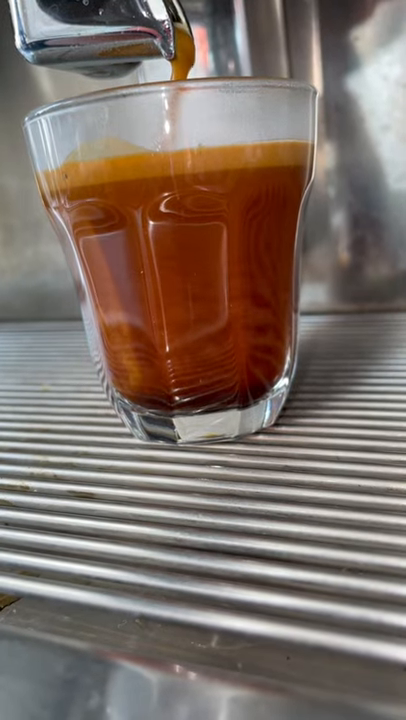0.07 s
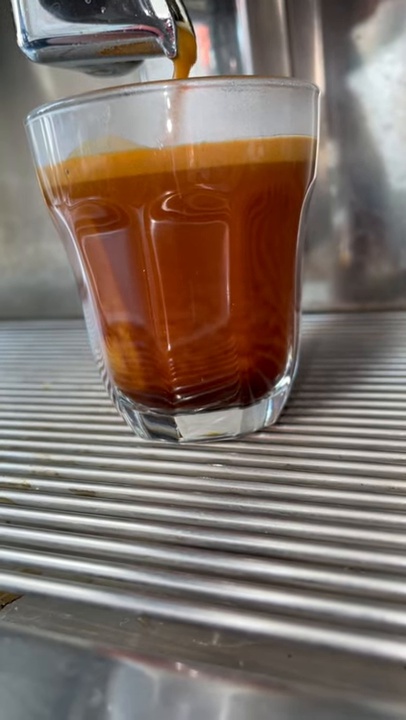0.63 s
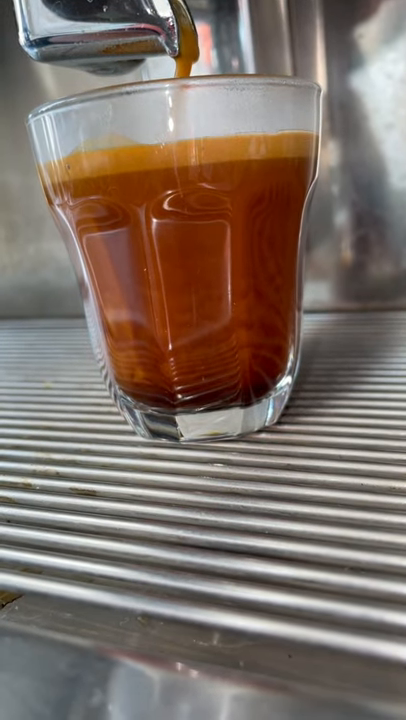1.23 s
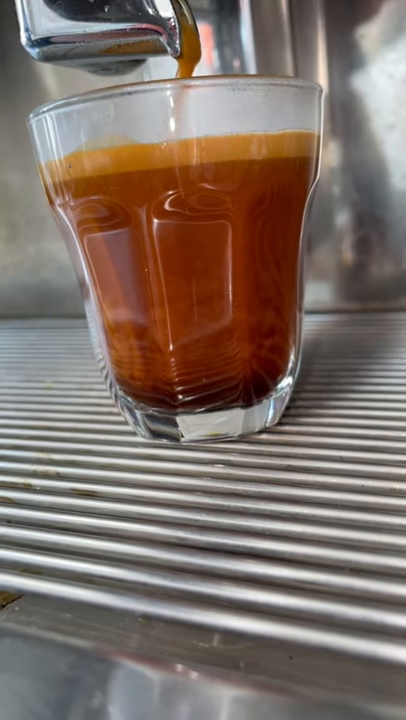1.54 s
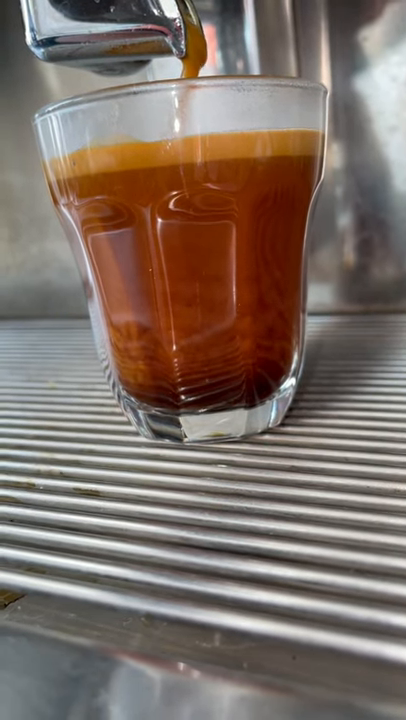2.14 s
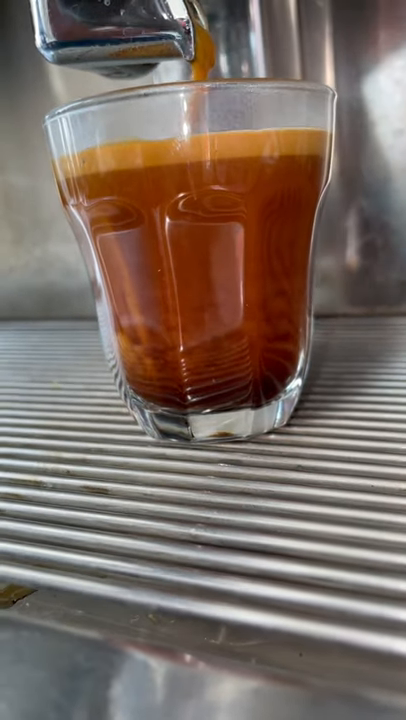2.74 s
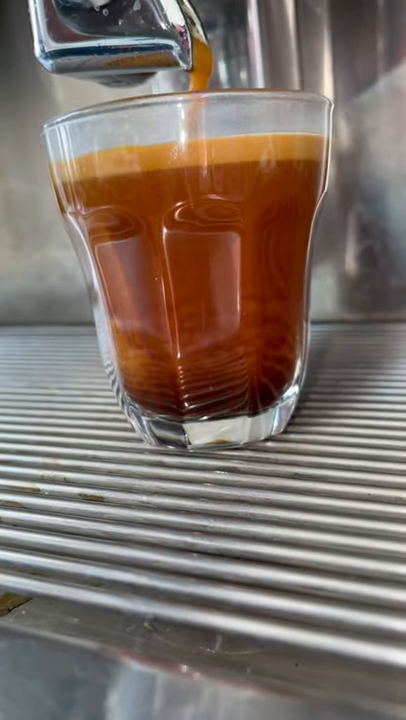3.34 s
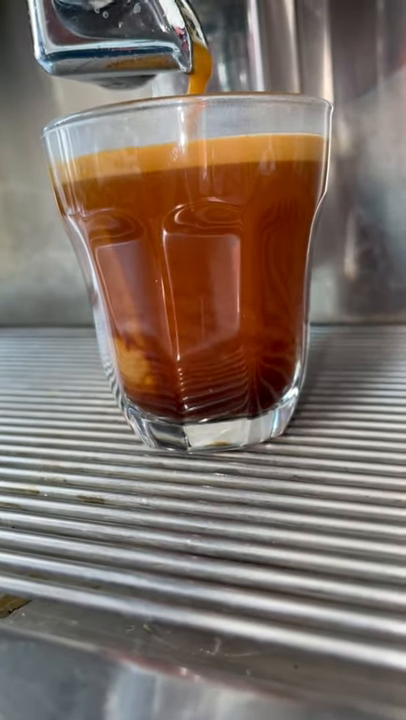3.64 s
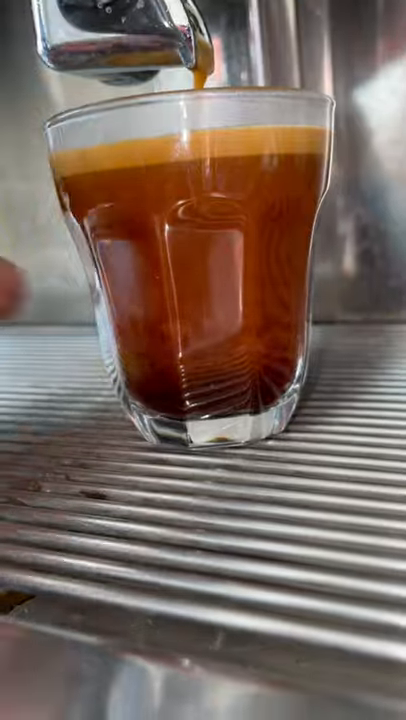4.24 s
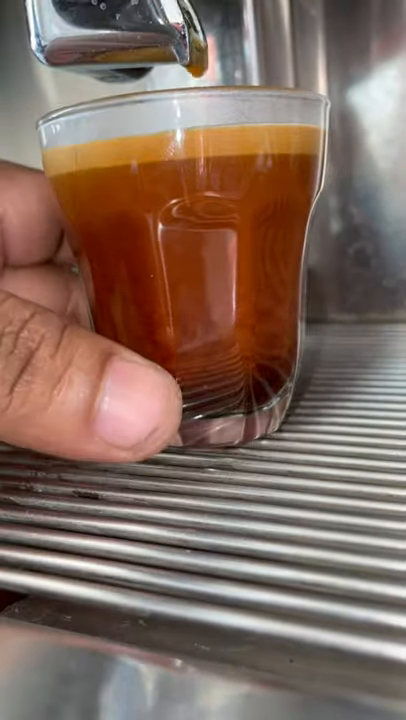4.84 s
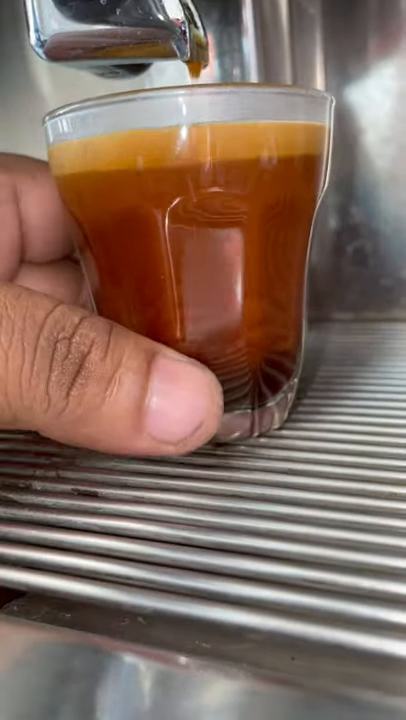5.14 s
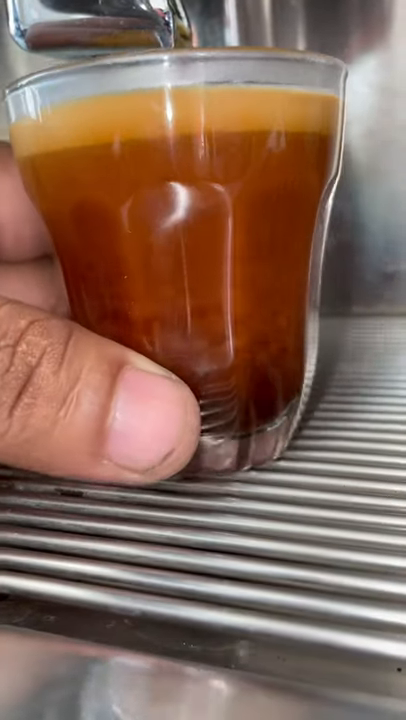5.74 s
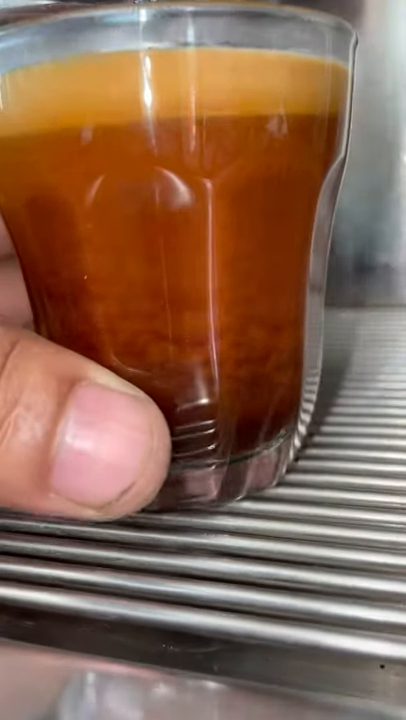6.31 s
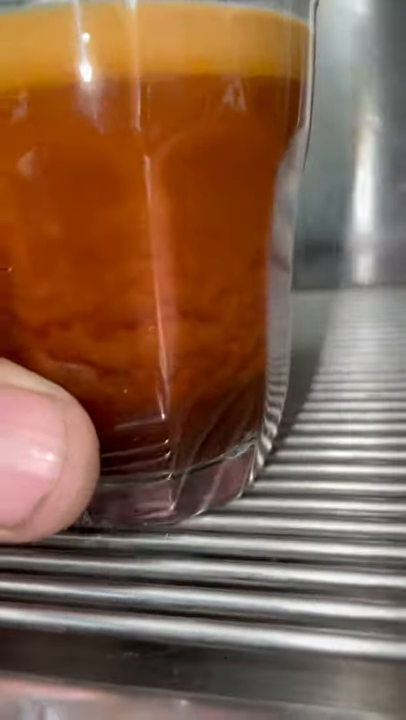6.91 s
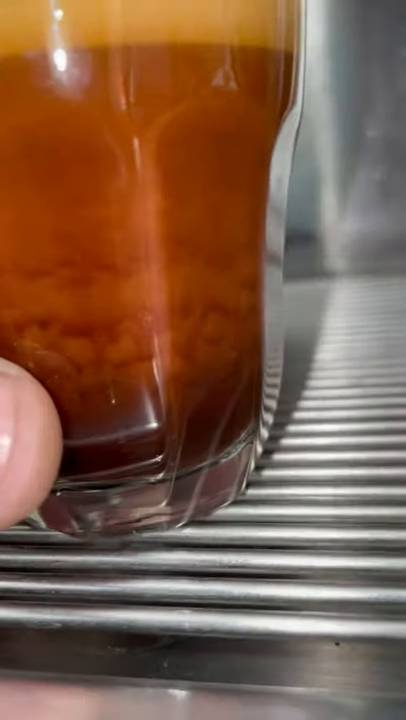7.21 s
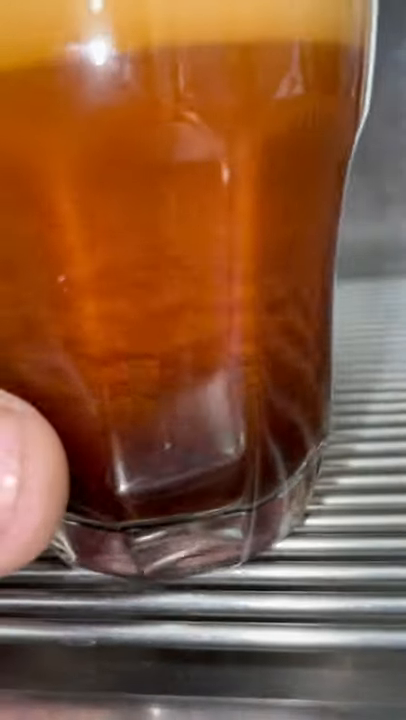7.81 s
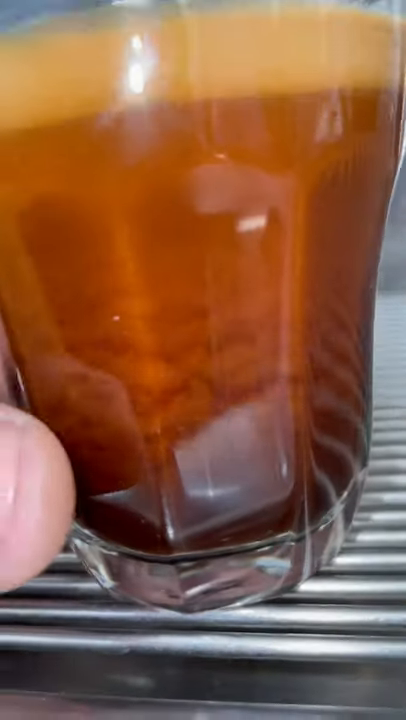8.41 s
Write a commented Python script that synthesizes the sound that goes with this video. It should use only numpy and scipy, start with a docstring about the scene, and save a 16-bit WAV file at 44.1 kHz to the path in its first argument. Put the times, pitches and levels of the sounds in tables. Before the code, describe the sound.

Close to the drip tray, an espresso machine pump hums and buzzes steadily over a low room rumble, and a glass rattles briefly. A valve snaps shut with a short metallic ring, the pump dies away and water ticks in the drain. The glass then scrapes lightly across the steel grille and squeals thinly. At the end the pump starts again with a soft bump.

```python
"""An espresso machine pulls a shot, heard from just above its drip tray. Over the low rumble of the bar, a
four-vane rotary pump hums and buzzes at harmonics of its shaft speed; the grille rattles briefly. A valve snaps
shut and sets the steel panels ringing, the pump dies away, a pipe knocks, and water ticks in the drain. The
glass is drawn across the steel grille: friction makes it scrape, then squeal thinly. At the end the pump motor
starts again without load, with a shudder and a soft bump."""
import sys
import numpy as np
from scipy import signal
from scipy.fft import rfft, irfft
from scipy.io import wavfile

SR = 44100
rng = np.random.default_rng(int(sys.argv[2]) if len(sys.argv) > 2 else 0)


def log_audio(samples):
    """Write samples as a 16-bit WAV file to the path given in sys.argv[1]."""
    # one column per channel
    frames = np.atleast_2d(samples).T
    # limit to full scale, then quantise
    limited = np.clip(frames, -1, 1)
    pcm = np.round(limited * 32767).astype(np.int16)
    wavfile.write(sys.argv[1], SR, pcm)


N = 381906
TIME = np.arange(N) / SR
FREQ = np.fft.rfftfreq(N, 1 / SR)
SIDES = np.array([[1], [-1]])  # left, right

# Noise spectrum of the bar's rumble: (f/Hz, density level/dB)
BAR_RUMBLE = [(22, -72), (32, -67), (48, -55), (70, -53), (100, -59), (140, -57), (165, -59.5), (320, -62),
              (365, -66), (410, -61), (455, -62.5), (490, -68.5), (580, -73.5), (800, -72.5), (1500, -83),
              (2300, -87), (2530, -85), (2750, -89.5), (4600, -100), (6000, -99), (11000, -101.2),
              (15500, -111.7)]
# Compressor and mains hum: (f/Hz, rms level/dB, relative unsteadiness)
FRIDGE_HUM = [(56.55, -32, 0.22), (84.9, -52.5, 0.4), (120.5, -39.5, 0.16), (219.5, -48.5, 0.51)]
# Low pump harmonics: (shaft order, level/dB, change without load/dB)
HUM_HARMONICS = [(4, -33.5, -2), (8, -34, 2.5), (12, -38, 7.5), (14, -43.5, -6), (15, -36, -12),
                 (16, -30, -2), (17, -44, 6), (18, -48, -3), (20, -43, 1), (21, -51, 10), (28, -49, 11),
                 (32, -53, -6)]
# High pump harmonics: (shaft order, mid-shot level/dB, growth over the shot/dB)
WHINE_HARMONICS = [(47, -57, 0), (56, -52.8, 0), (60, -48.8, 0), (64, -60.5, -3), (68, -62, 7),
                   (80, -59.5, 0), (100, -61.5, 7), (116, -65, 2), (128, -63, 3), (140, -59, 0),
                   (147, -61.5, 8), (151, -64, 8), (160, -63.5, 2), (311, -66, 0), (319, -59.5, 0),
                   (343, -61.5, 0), (351, -63, 0), (355, -65, 0), (409, -66, 0), (435, -65.5, 0),
                   (452, -67, 0)]
# Envelope that the casing gives the remaining harmonics: (f/Hz, level/dB)
BUZZ_SPECTRUM = [(600, -62), (850, -57.5), (1100, -69), (1500, -68), (1900, -75.5), (2200, -65.5),
                 (2450, -82), (3200, -78), (3900, -73.5), (4700, -81.5), (6000, -74.5), (7200, -74.5),
                 (10000, -73), (12000, -76.5), (15500, -93)]
# Water rushing through the pump: (f/Hz, density level/dB)
FLOW_SPECTRUM = [(400, -71), (800, -80), (1200, -101), (1600, -84), (2200, -86), (3000, -92), (3900, -81.5),
                 (4700, -91), (6000, -86.5), (7800, -90.5), (9600, -80), (12500, -91.5), (15500, -88)]
# Stereo balance of the pump's harmonics: (f/Hz, left minus right/dB)
PUMP_PAN = [(210, 0), (420, 3), (700, 4), (1300, 2.5), (2400, -1), (4400, 0)]
# Impacts of the four vanes: (position/turns, mid-shot level/dB, growth over the shot/dB)
VANE_IMPACTS = [(0, -45.5, 4), (.245, -41, -3), (.462, -39.5, -2), (.72, -49, 10)]
# Casing modes struck by a vane: (f/Hz, level/dB, rise/s)
CASING_MODES = [(3840, -1.5, 0.00074), (9590, -9.5, 0.0017)]
# Rattles of the grille, then scrapes of the glass on it: (t/s, level/dB, rise/s, sizzle level/dB, damping
# factor, # tilt/(dB/octave), contact note f/Hz, its relative level/dB)
GRILLE_SLIPS = [(2.4234, -37.5, 0.012, -51, 2, 0, 1950, -11), (2.485, -38.5, .015, -48, 2.5, -1, 2040, -10),
                (2.531, -39, 0.016, -48, 2.2, 1, 1850, -12), (2.612, -42, 0.012, -48, 2.5, 1, 2200, -12),
                (4.4227, -37.5, .011, -30, 6, -1, 5300, -11), (4.445, -41, .021, -47, 5, -1, 5350, -10),
                (4.555, -47, .014, -55, 4, -3, 5400, -15), (5.318, -43, 0.016, -55, 2, 4, 5700, -10),
                (5.535, -42, 0.031, -60, 4.5, -0.5, 1620, -10), (5.6, -42.5, 0.023, -60, 4, -1, 2170, -10),
                (5.77, -43, 0.026, -60, 4.6, -3, 900, -8), (5.803, -39.7, 0.02, -55, 2.3, -1, 5350, -13),
                (6.0644, -44.5, 0.015, -64, 2.5, 1, 3900, -12),
                (6.3424, -44, 0.0078, -63, 1.2, -6, 2150, -12), (6.372, -47, .009, -63, 2, -3, 2100, -8),
                (6.822, -46, 0.01, -52, 3, -1, 1250, -2), (6.979, -36.5, 0.02, -42, 1.5, 2.5, 2100, -12),
                (7.118, -36, 0.018, -44, 2.5, 3.5, 1610, -15), (7.1564, -42, .019, -31, 6, 1, 3150, -8),
                (7.4224, -40, 0.016, -56, 2, -2, 4200, -11), (7.48, -47.5, 0.02, -60, 5, -6, 1650, -7),
                (7.992, -35.5, .017, -56, 2, -1.5, 3800, -14)]
# Resonances of the grille: (f/Hz, half width/Hz, level/dB)
GRILLE_RESONANCES = [(660, 62, -14), (1700, 120, -12), (2155, 26, -9.5), (2480, 320, -13),
                     (3340, 33, -18.5), (3900, 39, -16), (4214, 16, -14), (5010, 22, -27),
                     (5170, 16, -16.5), (5630, 11, -19.5), (5850, 18, -22.5), (6460, 2200, -19)]
# Resonances that colour the steady rubbing: (f/Hz, half width/Hz, level/dB)
RUBBING_RESONANCES = [(720, 115, 4), (1500, 80, 3), (2125, 32, 4), (3850, 98, 1), (4200, 30, -5),
                      (5420, 230, -5), (6230, 230, -5.5), (6500, 900, -28), (11100, 680, -12.5),
                      (15000, 900, -25)]
# Impacts of the closing valve: (t/s, level/dB, tilt/(dB/octave))
VALVE_IMPACTS = [(3.528, -22, -7), (3.5832, -1.5, -5), (3.5846, -17.5, 4), (3.5856, -16.5, 4),
                 (3.587, -16, 3.5), (3.591, -24, -1), (3.5985, -22.5, 2.5), (3.607, -22, 0),
                 (3.6118, -24, 0), (3.6168, -22, -5)]
# Modes of the valve body: (f/Hz, level/dB, T60/s)
VALVE_BODY = [(490, -37, .05), (1200, -8, 0.019), (1440, -4.3, 0.0075), (1940, -17, .022),
              (3270, -17, 0.013), (4580, -23, .013), (5600, -9, 0.013), (6360, -4.5, 0.012),
              (9500, -13, 0.009), (11000, -16.5, 0.0075)]
# Diffuse ringing of the steel panels: (f/Hz, density level/dB)
PANEL_SPECTRUM = [(150, -82), (500, -49), (1100, -55.5), (2000, -58), (3500, -66), (6000, -64.5),
                  (8000, -69.5), (11000, -69.5), (15000, -79)]
# Distinct modes of the panels: (f/Hz, level/dB, T60/s)
PANEL_NOTES = [(1530, -38, 0.27), (2030, -33, 0.2), (2190, -31.5, .16), (2650, -45, .13),
               (3340, -28.5, .11), (4520, -32, .09), (5700, -35, .14), (6315, -27, 0.11)]
# Loudest ticks of water in the drain: (t/s, level/dB)
DRAIN_TICKS = [(3.8023, -38), (3.839, -43), (3.8706, -40), (3.904, -39), (3.947, -42), (3.9729, -40),
               (4.0008, -39), (4.0273, -41), (4.0537, -41), (4.083, -40), (4.1146, -42), (4.148, -41),
               (4.1989, -37), (4.227, -43), (4.31, -45), (4.3814, -46), (4.4084, -44), (4.7915, -43),
               (4.8369, -46)]
# Resonances excited by those ticks: (f/Hz, half width/Hz, level/dB)
DRAIN_RESONANCES = [(3800, 290, 1), (5500, 320, -3), (6300, 180, 1), (9600, 430, -9), (11200, 410, -3.5),
                    (15100, 830, -10)]
# Squeals of glass on steel: (t/s, duration/s, start f/Hz, end f/Hz, level/dB, roughness 0-1,
# relative level of the upper tone/dB)
GLASS_SQUEALS = [(7.202, 0.5, 11500, 11220, -58, .5, -15), (7.724, .1, 10000, 9950, -56, .4, -20),
                 (7.757, .07, 11400, 12200, -51, 0.71, -24), (7.81, .06, 10900, 11400, -54, .8, -6),
                 (7.867, .07, 10350, 10900, -53, 0.62, -1), (7.94, .2, 10900, 11050, -58.5, .85, 0),
                 (8.132, 0.24, 11000, 11480, -50.5, .65, -9), (8.341, 0.13, 11300, 10800, -53.5, .7, -3),
                 (8.48, 0.21, 10600, 10400, -52.5, 0.2, -34)]
# Friction hiss around a rough squeal: (f/Hz, half width/Hz, level/dB)
SQUEAL_BANDS = [(9100, 350, 0), (11300, 700, 1), (12700, 400, -2)]
# Shudder of the frame: (f/Hz, density level/dB)
FRAME_SPECTRUM = [(50, -62), (130, -56), (450, -70), (900, -68), (2000, -82), (5000, -105)]
# Stereo width at the two microphones: (f/Hz, side minus mid/dB)
STEREO_WIDTH = [(60, -39), (120, -48), (200, -28), (380, -11), (700, -2), (1300, -1), (2000, -6),
                (2600, 2.5), (4000, -5.5), (5500, -4.5), (7000, -68), (15000, -63)]
# Phase difference between the microphone ports: (f/Hz, phase/cycles)
PORT_PHASE_SHIFT = [(5400, 0), (6400, .25), (7600, .5), (9000, .78), (11000, 1), (14200, 1.5),
                    (15800, 1.68)]

SHAFT_HZ, IDLE_HZ = 27.1, 27.5
STOP_S, RESTART_S, UNLOAD_S = 3.585, 8.47, 0.021  # pump off, pump on, time constant of unloading
SNAP_S = VALVE_IMPACTS[2][0]  # first hard metal contact in the valve


def undb(db):
    """Amplitude ratio of a level in decibels."""
    return 10 ** (np.asarray(db) / 20)


def shape(table, hz):
    """Gain from an (f/Hz, level/dB) table, interpolated in log frequency."""
    f, db = np.transpose(table)
    return undb(np.interp(np.log(np.maximum(hz, 1)), np.log(f), db))


def unit(x):
    """Normalisation to rms 1."""
    return x / np.sqrt(np.mean(x ** 2))


def since(s):
    """Time elapsed since an onset; zero before it."""
    return np.maximum(TIME - s, 0)


def hold(start_s, end_s, attack_s, release_s):
    """Trapezoidal envelope: linear attack, hold and release."""
    return np.clip(np.minimum((TIME - start_s) / attack_s, (end_s - TIME) / release_s), 0, 1)


def pulse(age, rise_s):
    """Critically damped impulse response, peaking at 1 after rise_s."""
    return age / rise_s * np.exp(1 - age / rise_s)


def walk(rate_hz):
    """Slow random modulation: low-passed Gaussian noise of rms 1."""
    return unit(irfft(rfft(rng.standard_normal(N)) * np.exp(-(FREQ / rate_hz) ** 2), N))


def noise(density):
    """Mid-side noise of a given amplitude spectral density; the bass is coherent between the sides."""
    mid, side = irfft(rfft(rng.standard_normal((2, N))) * density * np.sqrt(SR / 2), N)
    return mid + SIDES * irfft(rfft(side) * shape(STEREO_WIDTH, FREQ), N)


def ringing(resonances):
    """Randomly excited resonances (f/Hz, half width/Hz, level/dB) add in power; scaled to rms 1."""
    power = 0
    for hz, width, db in resonances:
        detuning = (FREQ ** 2 - hz ** 2) / (2 * width * np.maximum(FREQ, 1))
        power += undb(db) ** 2 / (1 + detuning ** 2)
    return unit(noise(np.sqrt(power)))


def resonate(force, hz, half_width_hz):
    """Forced response of one damped mode, scaled so that white noise keeps its level."""
    pole = np.exp(2 * np.pi * (1j * hz - half_width_hz) / SR)
    return signal.lfilter([np.sqrt(2 * (1 - abs(pole) ** 2))], [1, -pole], force).imag


def bar():
    """Background noise: broadband rumble, and fridge hums modulated in amplitude and phase."""
    out = noise(shape(BAR_RUMBLE, FREQ))
    for hz, db, unsteadiness in FRIDGE_HUM:
        sway = 1 + unsteadiness * (walk(6.6) + 1j * walk(4.5))
        out += np.sqrt(2) * undb(db) * np.real(sway * np.exp(2j * np.pi * hz * TIME))
    return out


def motor(unloaded, coast_s=0.28, spin_up_s=0.0145, speed_loss=0.55):
    """Inertia: speed/Hz and drive/dB fall ever faster after switch-off, then recover to an idle."""
    unloaded_db, idle_db, coast_db = -3.5, -8.5, -65
    slowed = np.minimum(since(STOP_S) / coast_s, 1) ** 2.7 * np.exp(-since(RESTART_S) / spin_up_s)
    speed = np.where(TIME < RESTART_S, SHAFT_HZ, IDLE_HZ) * (1 - speed_loss * slowed)
    load_db = np.where(TIME < RESTART_S, unloaded_db * unloaded, idle_db)
    return speed, load_db + coast_db * slowed


def harmonics(turns, tones, control, waver_db, waver_hz, main_order=16, sideband_rad=1.15):
    """Rotation sounds at multiples of the shaft speed; each level follows the control and wavers."""
    out = np.zeros((2, N))
    for order, db, change_db in tones:
        hz = order * SHAFT_HZ
        waver = np.interp(TIME * waver_hz, np.arange(400), rng.standard_normal(400))
        spread = 1 + 1j * SIDES * shape(STEREO_WIDTH, hz) * rng.choice([-1, 1])
        stereo = spread * shape(PUMP_PAN, hz) ** (SIDES / 2)
        # phase-locked sidebands sway the strongest hum more in pitch than in level
        apart = abs(order - main_order)
        free_phase = 2 * np.pi * rng.random()
        phase = sideband_rad * apart if apart <= 2 else free_phase
        tone = np.exp(1j * (2 * np.pi * order * turns + phase))
        out += np.sqrt(2) * undb(db + change_db * control + waver_db * waver) * np.real(stereo * tone)
    return out


def revolve(turns, orders, rms, size=16384):
    """Fourier synthesis of one turn of vibration, repeated as the shaft goes round."""
    hz = orders * SHAFT_HZ
    phasor, across = np.exp(2j * np.pi * rng.random((len(orders), 2)).T)
    side = shape(STEREO_WIDTH, hz) * 1j * np.sign(across.imag)
    bins = np.zeros((2, size // 2 + 1), complex)
    bins[:, orders] = rms * phasor * (1 + SIDES * side) * shape(PUMP_PAN, hz) ** (SIDES / 2)
    cycle = irfft(bins) * size / np.sqrt(2)
    return np.array([np.interp(turns % 1 * size, np.arange(size), c, period=size) for c in cycle])


def casing_buzz(turns, vane_db=5, scatter_db=3, drift_hz=0.11):
    """Dense harmonics, stronger at multiples of the vane-passing rate; two sets slowly crossfade."""
    tonal_orders = [row[0] for row in [*HUM_HARMONICS, *WHINE_HARMONICS]]
    orders = np.setdiff1d(np.arange(19, 570), tonal_orders)
    envelope = shape(BUZZ_SPECTRUM, orders * SHAFT_HZ)
    out = np.zeros((2, N))
    for blend in (np.cos, np.sin):
        db = scatter_db * rng.standard_normal(len(orders)) + vane_db * (orders % 4 == 0) - 1
        out += blend(2 * np.pi * drift_hz * TIME) * revolve(turns, orders, envelope * undb(db))
    return out


def vane_ticks(turns, shot, scatter_db=1.8, jitter_turns=0.0003):
    """Periodic impacts: each vane rings the casing once a turn, never twice quite alike."""
    out = np.zeros(N)
    for place, db, growth_db in VANE_IMPACTS:
        turn_number = (turns - place + 1).astype(int)
        strength, lateness = rng.standard_normal((300, 2))[turn_number].T
        age = np.maximum((turns - place) % 1 - jitter_turns * lateness, 0) / SHAFT_HZ
        tick = sum(undb(mode_db) * pulse(age, rise_s) * np.sin(2 * np.pi * hz * age)
                   for hz, mode_db, rise_s in CASING_MODES)
        out += undb(db + growth_db * shot + scatter_db * strength) * tick
    return out


def pump(wobble=0.0002, pulsing=0.46, rise_db=2, load_power=4.6):
    """Rotating machine: whine, ticks, buzz and hiss depend on pressure and die sooner than the hum."""
    unloaded = 1 - np.exp(-since(STOP_S) / UNLOAD_S)
    speed, drive_db = motor(unloaded)
    turns = np.cumsum(speed * (1 + wobble * walk(10.3))) / SR
    shot = np.minimum(TIME / STOP_S, 1) - 0.5  # progress, zero at mid-shot
    hum = harmonics(turns, HUM_HARMONICS, unloaded, waver_db=0.33, waver_hz=7)
    whine = harmonics(turns, WHINE_HARMONICS, shot, waver_db=1, waver_hz=4)
    buzz = casing_buzz(turns)
    puffs = unit(np.exp(-pulsing * (4 * turns % 1)))  # each passing vane releases a puff of water
    hiss = noise(shape(FLOW_SPECTRUM, FREQ)) * undb(-1) * puffs
    under_load = whine + vane_ticks(turns, shot) + (buzz + hiss) * undb(rise_db * shot)
    return hum * undb(drive_db) + under_load * undb(load_power * drive_db)


def scrapes(grit_db=2, scatter_db=2, detune=0.012, note_width_hz=70, tail_db=-13, tail_s=0.07):
    """Friction drives the grille's modes; the glass's foot shifts and damps them and adds a note."""
    out, age = np.zeros((2, N)), TIME[:SR // 3]
    grit = undb(grit_db * walk(380))
    for s, db, rise_s, _, damping, tilt, note_hz, note_db in GRILLE_SLIPS:
        span = slice(int(s * SR), int(s * SR) + len(age))
        tail = undb(tail_db) * (1 - np.exp(-age / rise_s)) * np.exp(-age / tail_s)
        force = rng.standard_normal((2, len(age))) * np.hypot(grit[span] * pulse(age, rise_s), tail)
        modes = [(note_hz, note_width_hz, note_db)]
        for hz, width, mode_db in GRILLE_RESONANCES:
            shift, weight = rng.standard_normal(2)
            excited_db = mode_db + tilt * np.log2(hz / 3000) + scatter_db * weight
            modes.append((hz * (1 + detune * shift), min(width * damping, hz / 7), excited_db))
        for hz, width, mode_db in modes:
            mid, side = resonate(force, hz, width) * undb(db + mode_db)
            spread = shape(STEREO_WIDTH, hz)
            out[:, span] += (mid + SIDES * side * spread) / np.hypot(1, spread)
    return out


def rubbing(grip_s=4.42, slide_s=5.3, lift_s=8.75, bite_s=0.0029, sizzle_s=0.023):
    """Friction noise: each slip opens with a sizzle, and the glass rubs unevenly until it is lifted."""
    bursts = np.zeros(N)
    for s, _, _, db, *_ in GRILLE_SLIPS:
        age = since(s)
        bursts += undb(db - 5) * (1 - np.exp(-age / bite_s)) * np.exp(-np.minimum(age / sizzle_s, 20))
    sizzle = ringing([(10100, 1100, 10), (15000, 900, -14)]) * bursts
    gripped = undb(-56.5) * hold(grip_s, lift_s, attack_s=0.048, release_s=0.43)
    sliding = undb(-53.5) * hold(slide_s, lift_s, attack_s=0.11, release_s=0.43)
    contact = np.hypot(gripped, sliding) * undb(2 * walk(25))
    rub = ringing(RUBBING_RESONANCES) * contact
    grain = undb(2 * walk(220))
    return (rub + sizzle) * grain


def valve():
    """Impact excitation: the plunger's thud and a rattle of metal contacts ring the valve's modes."""
    out, age = np.zeros((2, N)), TIME[:SR // 4]
    for s, db, tilt in VALVE_IMPACTS:
        span = slice(int(s * SR), int(s * SR) + len(age))
        for hz, mode_db, t60 in VALVE_BODY:
            skew_rad = 0.47 * SIDES * min(hz / 9000, 1) * rng.choice([-1, 1])
            gain = undb(db + mode_db + tilt * np.log2(max(hz / 1500, 1)))
            out[:, span] += gain * undb(-60 * age / t60) * np.sin(2 * np.pi * hz * age + skew_rad)
    return out


def valve_reverberation(panel_db=-3.5, panel_t60=0.17, room_db=-16, room_t60=0.76, chatter_db=3):
    """Two-slope decay after the snap: the panels chatter briefly and the room rings on."""
    fall_db = -60 * since(SNAP_S)
    chatter = undb(panel_db + fall_db / panel_t60 + chatter_db * walk(300))
    room = undb(room_db + fall_db / room_t60)
    return noise(shape(PANEL_SPECTRUM, FREQ)) * (chatter + room) * (TIME > SNAP_S)


def panels():
    """Free vibration: the valve's blow leaves a few clear, decaying notes in the steel panels."""
    out, age, start = np.zeros((2, N)), TIME[:SR // 2], int(SNAP_S * SR)
    for hz, db, t60 in PANEL_NOTES:
        phase = 2 * np.pi * (hz * age + rng.random())
        skew_rad = SIDES * rng.choice([-1, 1]) * np.arctan(shape(STEREO_WIDTH, hz))
        out[:, start:start + len(age)] += undb(db - 60 * age / t60) * np.sin(phase + skew_rad)
    return out


def pipe_knock(at_s=3.731, decay_s=0.013, level_db=-27):
    """Three low resonances give a soft, hollow knock in the pipes as the pump runs down."""
    envelope = undb(level_db) * np.exp(-np.abs(TIME - at_s) / decay_s)
    return ringing([(334, 39, 0), (460, 44, -1), (676, 40, -1)]) * envelope


def drain(rise_s=0.0012, trickle_start_s=4.25, trickle_end_s=5.2, trickle_db=-46.5, count=30):
    """Impulsive excitation by draining water: a quick run of ticks, then a fainter random trickle."""
    progress = (np.arange(count) + rng.random(count)) / count
    times = trickle_start_s + (trickle_end_s - trickle_start_s) * progress
    levels = trickle_db + 0.5 * rng.standard_normal(count)
    envelope, age = np.zeros(N), TIME[:SR // 20]
    for s, db in [*DRAIN_TICKS, *zip(times, levels)]:
        start = int(s * SR)
        envelope[start:start + len(age)] += undb(db - 4) * pulse(age, rise_s)
    return envelope * ringing(DRAIN_RESONANCES)


def squeals(upper_ratio=1.14, bend_hz=40.1, waver_hz=70, spread_hz=190, flutter_db=4.5):
    """Friction tones: two swell and bend with pressure; roughness makes them waver, sputter and hiss."""
    hz, gain, rough, upper_gain = np.zeros((4, N))
    for s, length, start_hz, end_hz, db, roughness, upper_db in GLASS_SQUEALS:
        on = (TIME > s) & (TIME < s + length)
        progress = (TIME[on] - s) / length
        pressure = np.sin(np.pi * progress)
        hz[on] = start_hz + (end_hz - start_hz) * progress + bend_hz * pressure
        gain[on] = undb(db - 1) * np.abs(pressure) ** 0.3
        rough[on], upper_gain[on] = roughness, undb(upper_db)
    hz += waver_hz * rough * walk(41.5)
    gain *= undb(flutter_db * rough * walk(55))
    tones = np.zeros((2, N))
    for channel in tones:
        for ratio, weight in ((1, 1), (upper_ratio, upper_gain)):
            jittered_hz = hz * ratio + spread_hz * rough * walk(504)
            channel += weight * np.sin(2 * np.pi * np.cumsum(jittered_hz) / SR)
    hiss = ringing(SQUEAL_BANDS) * rough * undb(-1)
    return (np.sqrt(2) * tones + hiss) * gain


def frame_shudder(length_s=0.21):
    """Forced vibration: the motor shakes the frame as it starts."""
    envelope = hold(RESTART_S, RESTART_S + length_s, attack_s=0.068, release_s=0.095)
    return envelope * noise(shape(FRAME_SPECTRUM, FREQ))


def bump(at_s=8.608, decay_s=0.0054, hz=140):
    """A low transient of about one cycle is heard as a soft bump as the motor gets going."""
    age = TIME - at_s
    envelope = undb(-19) * np.exp(-np.minimum(np.abs(age) / decay_s, 20))
    return -envelope * np.sin(2 * np.pi * hz * age)


def scene():
    """Superposition of the machine, the glass and the room."""
    machine = pump() + valve() + valve_reverberation() + panels() + pipe_knock() + drain()
    glass = scrapes() + rubbing() + squeals()
    return machine + glass + bar() + frame_shudder() + bump()


def record(dry, low_hz=28, top_hz=15800):
    """Phase shift and band limiting: two microphone ports hear the treble out of step."""
    cycles = np.interp(FREQ, *np.transpose(PORT_PHASE_SHIFT))
    shifted = irfft(rfft(dry) * np.exp(1j * np.pi * SIDES * cycles), N)
    highpass = signal.butter(4, low_hz, "high", fs=SR, output="sos")
    lowpass = signal.ellip(8, 0.2, 70, top_hz, fs=SR, output="sos")
    return signal.sosfilt(lowpass, signal.sosfilt(highpass, shifted))


dry = scene()
out = record(dry)
log_audio(out)
```